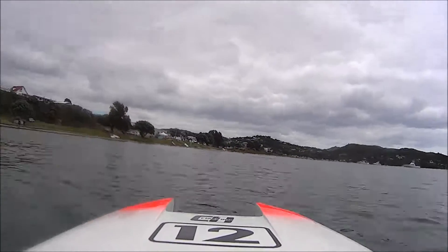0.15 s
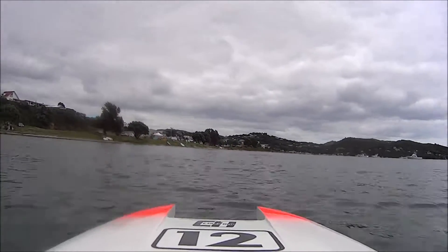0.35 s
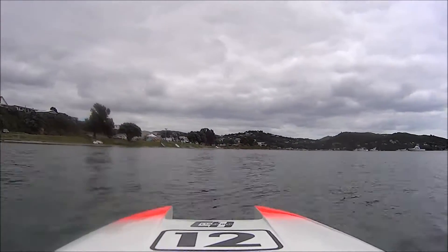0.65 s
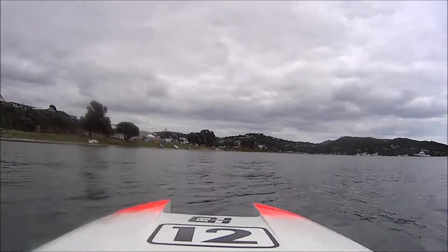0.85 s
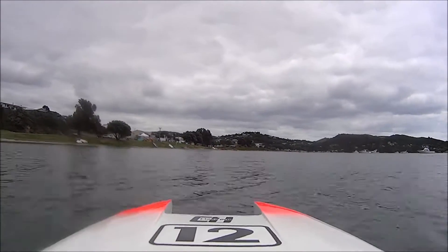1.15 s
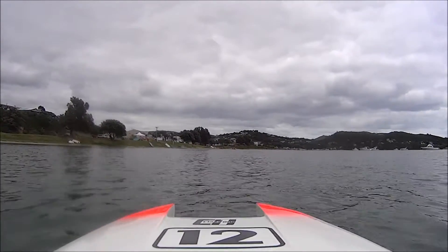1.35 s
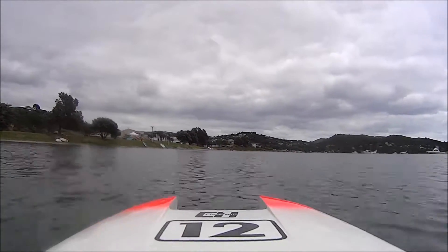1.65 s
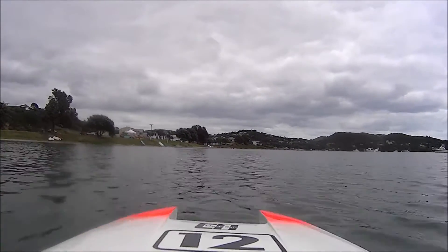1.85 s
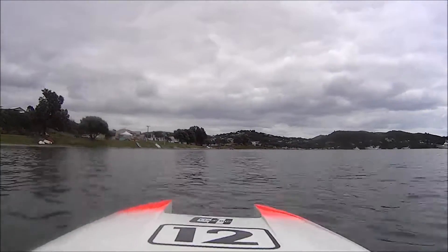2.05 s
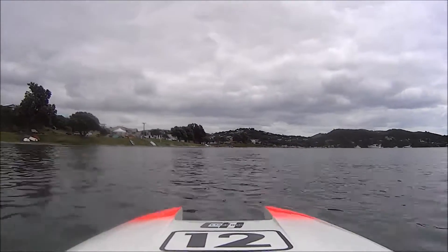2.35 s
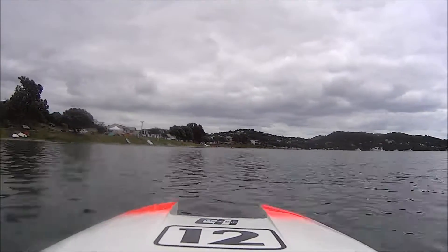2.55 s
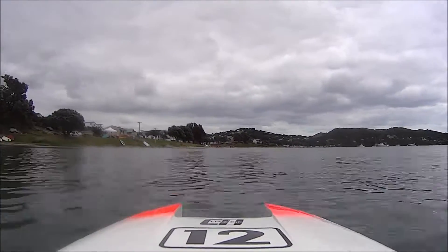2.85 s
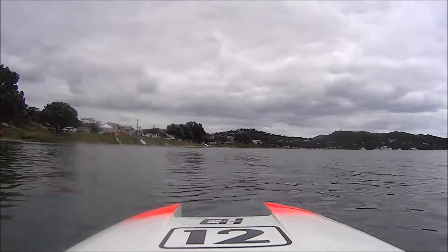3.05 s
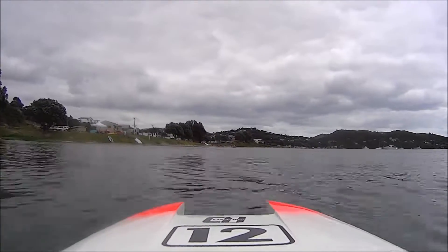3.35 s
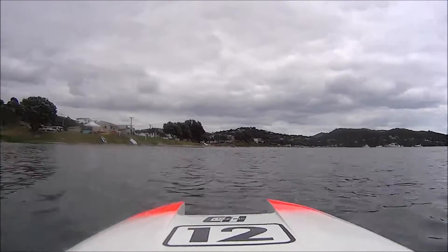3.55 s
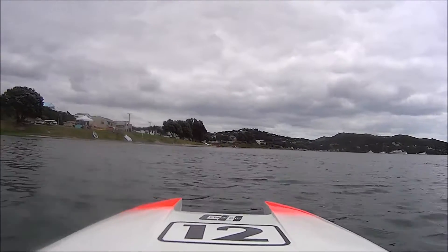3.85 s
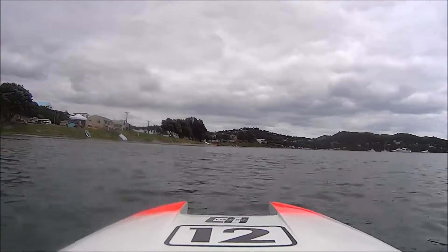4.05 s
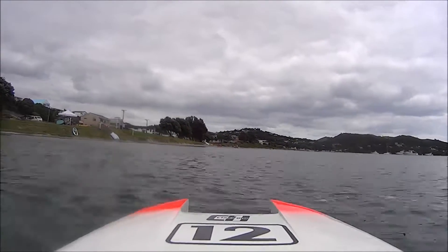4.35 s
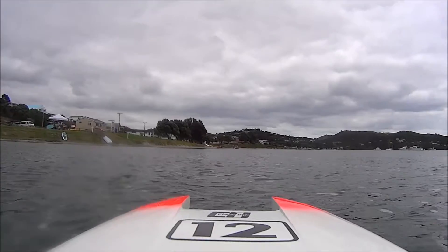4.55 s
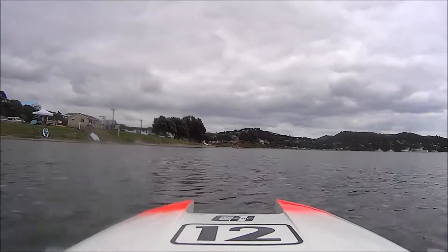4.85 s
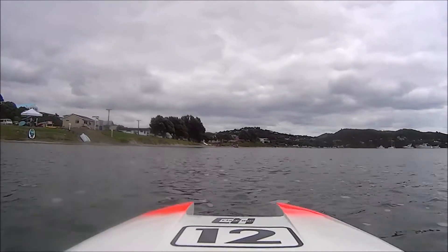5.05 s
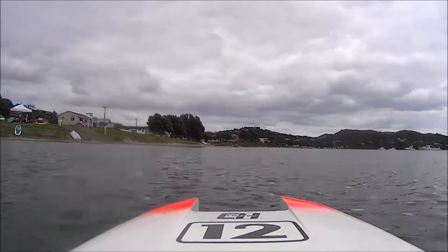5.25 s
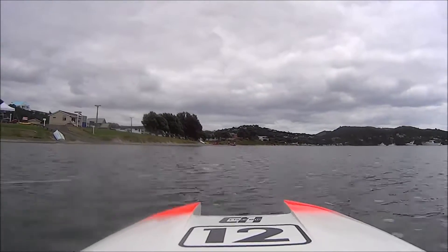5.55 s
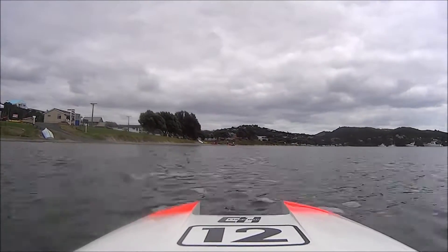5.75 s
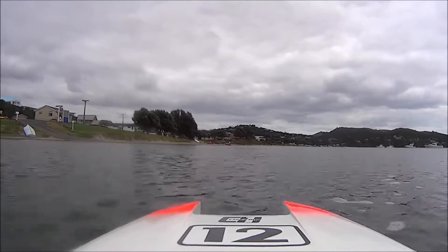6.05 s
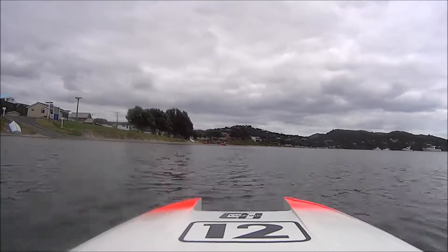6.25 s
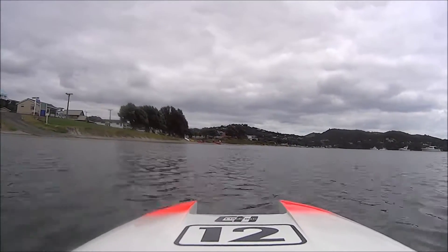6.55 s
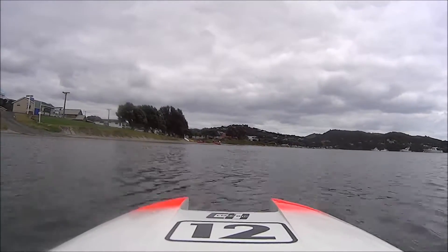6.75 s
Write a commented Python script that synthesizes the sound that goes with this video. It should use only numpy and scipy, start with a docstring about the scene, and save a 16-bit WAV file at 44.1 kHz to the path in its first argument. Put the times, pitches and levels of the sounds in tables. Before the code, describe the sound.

Two slightly detuned electric boat motors whine loudly and beat together under rushing spray and slaps, then drop abruptly into a low, bubbling wash.

```python
"""Two beating shaft whines come first, under a rush of spray: a model catamaran planes over chop, then settles.
The microphone pair rides aboard, behind two ports, at no distance from the hull that carries the sound.
Each drive is a stack of shaft-order sines at a slightly different speed; spray, wash, singing fittings and
hull boom are coloured noises; slaps are short noise bursts; at part throttle the speed controllers whistle
as one wavering sine."""
import sys
import numpy as np
from scipy import signal
from scipy.fft import rfft, irfft, next_fast_len
from scipy.io import wavfile
from scipy.ndimage import uniform_filter1d, minimum_filter1d, map_coordinates

SR = 44100
rng = np.random.default_rng(int(sys.argv[2]) if len(sys.argv) > 2 else 0)


def int16_out(signal):
    """Quantize to a 16-bit WAV file."""
    q = np.round(np.clip(np.atleast_2d(signal).T, -1, 1) * 32767)
    wavfile.write(sys.argv[1], SR, q.astype(np.int16))


N = 305172

# throttle of the slower drive, before skips and trims: start_s, shaft_hz, whine_db, once_per_turn_db
THROTTLE = [(0, 490.9, -17, -27.5), (.8, 494, -16, -33), (1.7, 493, -16, -30.5), (1.85, 494.2, -19, -26.5),
            (2.0, 495.2, -15.5, -31), (2.8, 492.5, -17.5, -32.5), (3.6, 494.6, -16, -33),
            (4.64, 495, -15.5, -32), (4.71, 489.8, -20.5, -30), (4.76, 418.2, -25, -42),
            (4.8, 402.7, -19.5, -36.5), (4.87, 410, -21.5, -34.5), (4.94, 408.4, -16, -39.5),
            (5.0, 388, -17.5, -32), (5.05, 350, -33, -28.5), (5.1, 320, -30.5, -28),
            (5.18, 302.9, -42, -32), (5.3, 288.9, -49, -40.5), (5.45, 280.6, -45, -49),
            (5.65, 275.8, -30.5, -45), (5.9, 265.1, -34, -37), (6.2, 246.8, -28, -43),
            (6.55, 239.2, -28, -48), (6.92, 228.2, -30, -42.5)]
# the hull skips and the propellers catch air, before bite and shares: peak_s, extra_shaft_hz
SKIPS = [(0.035, 15.4), (0.279, 17.95), (0.484, 25.57), (0.609, 21.67), (0.74, 16.66), (0.886, 21.04),
         (1.063, 21.84), (1.217, 18.54), (1.457, 16.73), (1.541, 19.84), (1.736, 29.05), (1.841, 25.36),
         (1.989, 16.47), (2.09, 19.58), (2.205, 19.22), (2.335, 16.06), (2.599, 16.08), (2.728, 22.98),
         (2.858, 11.9), (2.998, 22.74), (3.193, 18.22), (3.456, 18.73), (3.662, 20.05), (3.906, 18.36),
         (4.19, 17.8), (4.36, 16.15), (4.545, 16.33)]
# upper shaft orders [multiples of shaft speed], and the strength of each [dB]
UPPER_ORDERS = (4, 5, 6, 9, 18)
UPPER_LEVELS_DB = (-9, -6.5, -1, -9, -12)
# how the hull passes the upper orders on: pitch_hz, level_db
HULL_TRANSFER = [(900, -34), (1150, -32), (1400, -27.5), (1650, -36), (2000, -44), (2250, -46.5),
                 (2500, -42), (3000, -47.5), (4400, -49.5), (5300, -52), (9000, -65)]
# from planing to displacement, before chop and slaps: start_s, spray_db, wash_db, boom_db
WATER_LEVELS = [(0, -20.5, -64, -48), (2.3, -20.5, -63.5, -53), (4.5, -21.5, -54, -55.5),
                (4.75, -21.5, -35, -50), (5, -24.5, -27.5, -55), (5.15, -37.5, -22.5, -51),
                (5.4, -43, -20, -42.5), (5.65, -49, -19, -44), (5.88, -53, -18, -40.5),
                (6.1, -58.5, -17.5, -40.5), (6.4, -60.5, -16.5, -41.5), (6.6, -59.5, -16.5, -39.5),
                (6.92, -59.5, -18, -46)]
# relative colours of spray and wash: pitch_hz, level_db_per_hz
SPRAY_COLOUR = [(40, -27), (200, -24.5), (450, -14), (800, -19.5), (1150, -12.5), (1500, 1.5),
                (1800, -12.5), (2300, -18.5), (3100, -17.5), (3700, -30.5), (5000, -31.5), (6000, -33),
                (7800, -37.5), (10800, -51)]
WASH_COLOUR = [(24, -49.5), (40, -34.5), (81, -17), (192, -24.5), (254, -17.5), (525, -15.5), (729, -10),
               (1040, -14), (1400, 0.5), (2240, -15.5), (3260, -19), (3840, -30.5), (5200, -28),
               (8310, -38), (10800, -55.5), (14000, -84), (22000, -120)]
# fine hull peaks and notches: pitch_hz, width_hz, level_db
HULL_PEAKS = [(2750, 88, 3), (3720, 80, 4.5), (3934, 170, 7), (4986, 160, 8), (5330, 91, 2.5),
              (8500, 250, -3.5), (8850, 400, 5), (10000, 120, 3.5), (10430, 200, -18)]
# boom of the hollow hull: pitch_hz, width_hz
HULL_BOOM = (85, 16)
# metal fittings that sing under vibration: pitch_hz, width_hz (before squaring), level_db
FITTING_MODES = [(4540, 140, -1.5), (4920, 160, -4.5), (5260, 130, -8.5), (7630, 260, -5), (9500, 150, -22),
                 (10630, 240, -19)]
# level of the singing, before chop: start_s, level_db
FITTING_LEVEL = [(0, -45.5), (4.7, -44), (4.8, -59.5), (5.08, -56), (5.12, -43), (5.4, -40.5), (5.48, -53),
                 (6.92, -58.5)]
# the two microphone ports: pitch_hz, likeness_0_to_1, left_lead_rad, left_minus_right_db
PORT_PATHS = [(30, .75, 2.3, 2.5), (86.6, .9, -0.5, 2.5), (300, .2, 2.5, 1), (500, 0.4, 1, 1.5),
              (980, 0.2, 1.5, 3), (1135, 0, 1, -2.5), (1528, 1, 0.45, 6.5), (1756, 1, -1, 10.5),
              (2180, 0.3, 2, 0), (3060, 0, 0.5, 4.5), (3590, 0.77, -2, 0), (4390, 0.6, -6, -3.5),
              (5100, 0.96, -5.5, 2.5), (5660, 0.5, -7.5, 0.5), (10800, 0.3, -8.5, 1)]
# wave slaps under the hull, before trim: start_s, level_db, left_minus_right_db
HULL_SLAPS = [(0.024, -19, 12), (0.049, -31.5, -1), (0.287, -27, 3.5), (0.461, -28.5, 11),
              (0.547, -29, 8.5), (0.88, -26, 6), (1.069, -37.5, -2), (1.235, -27.5, 4.5), (1.507, -26, 9.5),
              (1.859, -21.5, 0.5), (2.043, -25, 3.5), (2.241, -29, -0.5), (2.329, -22, -1), (2.666, -28, 4),
              (3.209, -29.5, -2), (3.523, -20.5, 4), (3.55, -36, -3), (4.448, -28.5, -2),
              (4.673, -23.5, 7.5), (4.729, -27.5, -1.5), (4.82, -28.5, -2.5), (6.578, -30, -10.5)]
# relative colour of a slap: pitch_hz, level_db_per_hz
SLAP_COLOUR = [(40, -10), (150, 3.5), (500, 7), (1200, 1), (3000, -19), (8000, -45)]
# controller whistle, before flutter: start_s, level_db
WHISTLE_LEVEL = [(0, -110), (5.04, -110), (5.1, -66), (6, -56), (6.92, -54.5)]

WHISTLE_HZ, TOP_HZ = 8018, 10950  # whistle pitch; band limit
# The second drive: speed ratio to the slower one, more added as speed drops below APART_HZ
FASTER, DRIFT_APART, APART_HZ = 1.025, .02, 440.2
TWICE_DB = -45  # slower drive, twice a turn
HANDOVER_DB, SPLASH_DB = 0.2, 0.06  # per extra Hz: slower drive's whine falls, spray lifts
RACE_S, SAG_S = .024, .034  # rise and fall of a skip
SLOW_SHARE, FAST_SHARE = .75, .8  # part of the extra speed each drive takes
BITE, BITE_S = .3, .08  # drag of the blades digging in around a skip: share, half length
PART_DB, PART_HZ = (3.6, 7.4, 6.8, 18.1, 14), 332.1  # gain of each upper order below this shaft speed
BOOM_DB, BOOM_RISE_S, BOOM_T60 = -24, 0.027, 0.41  # boom set off by a slap: gain, rise, 60 dB decay in s
TIME = np.arange(N) / SR


def amp(db):
    """Decibels to gain."""
    return 10 ** (np.asarray(db) / 20)


def unit(x):
    """Scale to rms 1."""
    return x / np.sqrt(np.mean(x ** 2) + 1e-20)


def along(points, hz):
    """Read the columns after the first on a log-frequency axis."""
    f, *cols = np.transpose(points)
    return np.squeeze([np.interp(np.log(hz + 1), np.log(f + 1), c) for c in cols])


def curves(rows):
    """Read each column after the time at every sample."""
    s, *cols = np.transpose(rows)
    return [np.interp(TIME, s, c) for c in cols]


def wobble(rate):
    """A smooth random curve with this many knots a second."""
    knots = rng.standard_normal(int(N * rate / SR) + 4)
    return map_coordinates(knots, [TIME * rate])


def filtered(x, response):
    """Multiply the spectrum by a response of frequency."""
    m = next_fast_len(N + SR // 2)
    spectrum = rfft(x, m) * response(np.fft.rfftfreq(m, 1 / SR))
    return irfft(spectrum, m)[..., :N]


def resonance(hz, centre_hz, width_hz):
    """Gain of one resonance, 1 at its centre."""
    return hz * width_hz / np.abs(centre_hz ** 2 - hz * hz + 1j * hz * width_hz)


def ports(pair):
    """Mix a shared and an unshared part into left and right by the ports' likeness, lead and balance."""
    m = next_fast_len(N + SR // 2)
    alike, lead, tilt_db = along(PORT_PATHS, np.fft.rfftfreq(m, 1 / SR))
    turn = np.arccos(np.clip(alike, 0, 1)) / 2
    shared, unshared = rfft(pair, m) * [np.cos(turn), np.sin(turn)]
    skew = amp(tilt_db / 2) * np.exp(.5j * lead)
    return irfft(np.array([(shared + unshared) * skew, (shared - unshared) / skew]), m)[:, :N]


def rush(colour, patchy_db):
    """Two coloured noises of rms 1 that share patches of random gain in time and frequency."""
    z = signal.stft(rng.standard_normal((2, N)), nperseg=512)[2]
    field = rng.standard_normal(z.shape[1:])
    field = uniform_filter1d(uniform_filter1d(field, size=10, axis=0), size=10, axis=1)
    pair = signal.istft(z * amp(patchy_db * unit(field)), nperseg=512)[1][:, :N]
    return unit(filtered(pair, colour))


def racing():
    """Extra shaft speed (Hz) while the propellers run light: up fast, dragged back more slowly."""
    def bump(s, width_s):
        return np.exp(-((TIME - s) / width_s) ** 2)

    extra = 0
    for s, hz in SKIPS:
        skip = bump(s, np.where(TIME < s, RACE_S, SAG_S))
        extra = extra + hz * (skip - BITE * bump(s, BITE_S))
    return extra


def easing(shaft_hz, below_hz):
    """Near 0 well above the given shaft speed, near 1 well below it."""
    return 1 / (1 + (shaft_hz / below_hz) ** 12)


def motor(shaft_hz, whine_db, jitter, flutter_db, once_db, twice_db, upper_db):
    """One drive: the third shaft order is the whine; load changes shake speed and strength."""
    warble = 1 + jitter * (wobble(22) + wobble(50))
    turns = 2 * np.pi * (np.cumsum(shaft_hz * warble) / SR + rng.random())
    whine = amp(whine_db + flutter_db * (wobble(35) + wobble(16))) * np.sin(3.0 * turns)
    once_level = amp(once_db + 2.43 * wobble(25) + 2.25 * wobble(10))
    once = once_level * np.sin(turns + 0.94 * wobble(40))
    twice = amp(twice_db + 4 * wobble(25)) * np.sin(2 * turns + 1.67 * wobble(70))
    # the flexible shaft winds and unwinds, smearing high orders most
    twisted = turns + 0.03 * wobble(60)
    eased = easing(shaft_hz, PART_HZ)  # chopped current is richer in overtones
    upper = 0
    for k, order_db, part_db in zip(UPPER_ORDERS, UPPER_LEVELS_DB, PART_DB):
        level_db = order_db + part_db * eased + along(HULL_TRANSFER, k * shaft_hz) + upper_db
        upper = upper + amp(level_db + 4 * wobble(9)) * np.sin(k * twisted)
    return np.sqrt(2) * (whine + once + twice + upper)


def motors():
    """Both drives beat together; each reaches the two ports by its own path through the hull."""
    shaft_hz, whine_db, once_db = curves(THROTTLE)
    extra = racing()
    eased = easing(shaft_hz, APART_HZ)  # eased off, the slower shaft shakes the hull more
    trade_db = 1.3 * wobble(20)  # the load swings from one propeller to the other
    slow = motor(shaft_hz + SLOW_SHARE * extra, whine_db + trade_db - HANDOVER_DB * extra,
                 jitter=.005, flutter_db=1.75, once_db=once_db - 3 + 5.5 * eased,
                 twice_db=TWICE_DB, upper_db=-0.8)
    fast_hz = (FASTER + DRIFT_APART * eased) * shaft_hz + FAST_SHARE * extra
    fast = motor(fast_hz, whine_db - trade_db - 3.0,
                 jitter=.0075, flutter_db=2.73, once_db=once_db - 7.5 * eased,
                 twice_db=TWICE_DB + 2.5, upper_db=-2.5)
    return ports(np.array([slow + fast, 0.87 * (slow - fast)]))


def hull_peaks_db(hz):
    """Narrow peaks and notches that the hull puts on the water noise."""
    return sum(db / (1 + (2 * (hz - c) / w) ** 2) for c, w, db in HULL_PEAKS)


def spray(level_db, chop_db):
    """Noise of thrown water while planing, lifted by chop and skips."""
    level = amp(level_db + chop_db + SPLASH_DB * racing())
    return level * rush(lambda hz: amp(along(SPRAY_COLOUR, hz) + hull_peaks_db(hz)), patchy_db=1.25)


def hull_boom(level_db):
    """The hollow hull resonates to noise; each slap swells it, then it dies away."""
    struck = 0
    for s, db, _ in HULL_SLAPS:
        t = np.maximum(TIME - s, 0)
        struck = struck + amp(db + BOOM_DB - 60 * t / BOOM_T60) * (1 - np.exp(-t / BOOM_RISE_S))
    level = amp(level_db + 2.5 * wobble(9)) + struck
    return level * rush(lambda hz: resonance(hz, *HULL_BOOM), patchy_db=0.8)


def fittings(chop_db):
    """Metal fittings sing as noise through narrow squared resonances."""
    def metal(hz):
        return sum(amp(db) * resonance(hz, c, w) ** 2 for c, w, db in FITTING_MODES)

    return amp(curves(FITTING_LEVEL)[0] + 0.54 * chop_db) * rush(metal, patchy_db=1.0)


def wash(level_db, chop_db):
    """Heavier water noise once the hull sinks in."""
    level = amp(level_db + 0.89 * chop_db)
    return level * rush(lambda hz: amp(along(WASH_COLOUR, hz) + hull_peaks_db(hz)), patchy_db=1.8)


def water():
    """Spray, boom, fittings and wash reach both ports; ripples lift all but the boom."""
    spray_db, wash_db, boom_db = curves(WATER_LEVELS)
    chop_db = 1.1 * np.abs(wobble(22)) + 2.03 * np.maximum(wobble(40), 0) + 0.4 * wobble(8)
    return ports(spray(spray_db, chop_db) + hull_boom(boom_db) + fittings(chop_db) + wash(wash_db, chop_db))


def slaps():
    """Each wave slap is a short dull noise burst, unlike at the two ports."""
    swell, t = np.zeros((2, N + SR)), np.arange(SR // 8) / SR
    for s, db, pan_db in HULL_SLAPS:
        burst = amp(db + 5 - 60 * t / 0.16) * (1 - np.exp(-t / 0.0077))
        start = round(s * SR)
        swell[:, start:start + len(t)] += amp([[pan_db / 2], [-pan_db / 2]]) * burst
    return swell[:, :N] * rush(lambda hz: amp(along(SLAP_COLOUR, hz)), patchy_db=-2.0)


def whistle():
    """The controllers chop the current at a fixed rate below full throttle; the phase wavers."""
    phase = 2 * np.pi * WHISTLE_HZ * TIME + 1.2 * wobble(25)
    level = amp(curves(WHISTLE_LEVEL)[0] + 2.5 * wobble(22))
    return level * np.sqrt(2) * np.sin(phase) * amp([[-1.5], [1.5]])  # right port louder


def scene():
    """Everything heard aboard."""
    return motors() + water() + slaps() + whistle()


def record(dry):
    """A soft limiter eases the peaks down, both channels together; nothing stays above the band limit."""
    need = np.minimum(1, .6 / (np.abs(dry).max(axis=0) + 1e-9)) ** .7
    gain = uniform_filter1d(minimum_filter1d(need, size=260), size=200)
    return filtered(dry * gain, lambda hz: hz < TOP_HZ)


dry = scene()
out = record(dry)
int16_out(out)
```